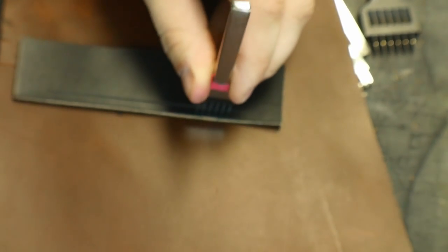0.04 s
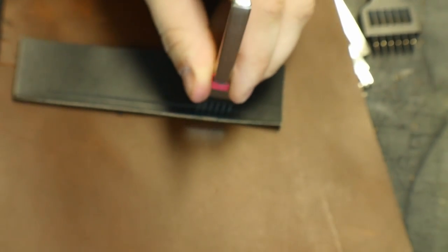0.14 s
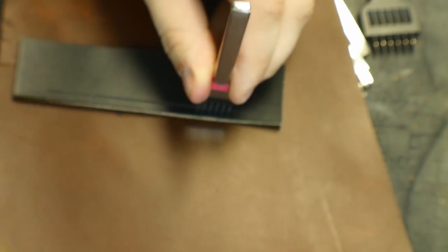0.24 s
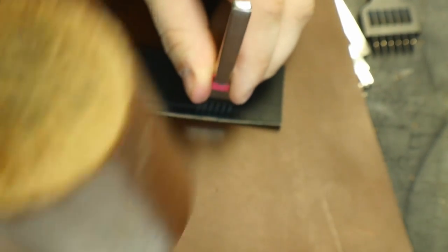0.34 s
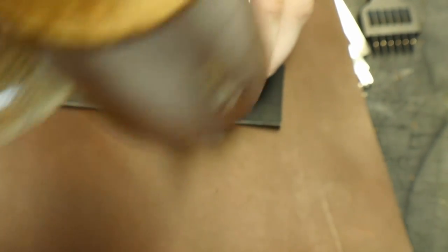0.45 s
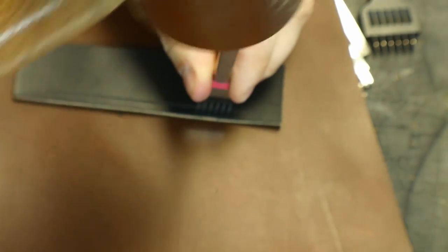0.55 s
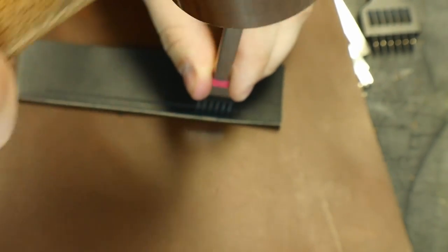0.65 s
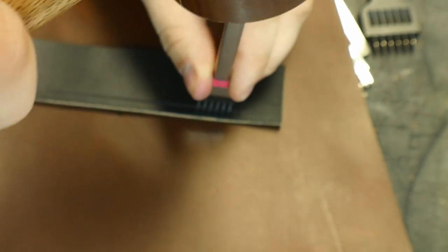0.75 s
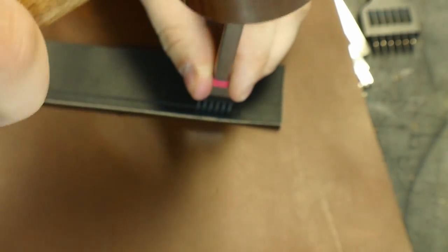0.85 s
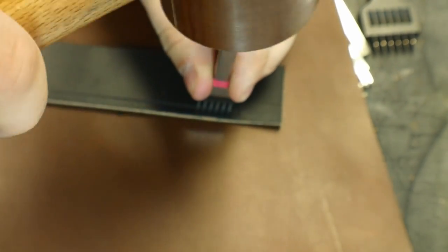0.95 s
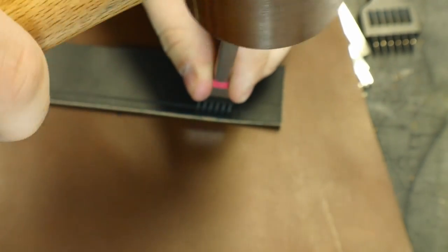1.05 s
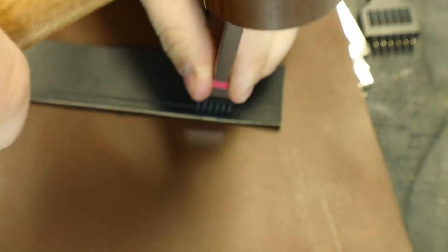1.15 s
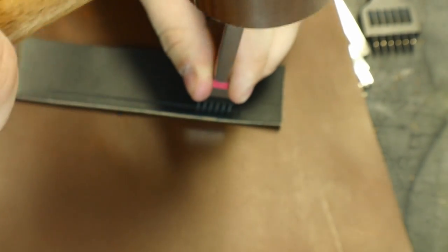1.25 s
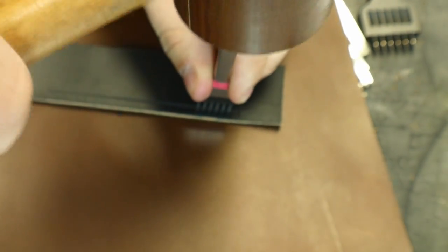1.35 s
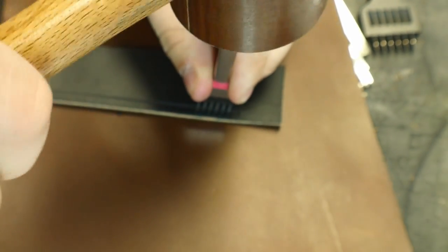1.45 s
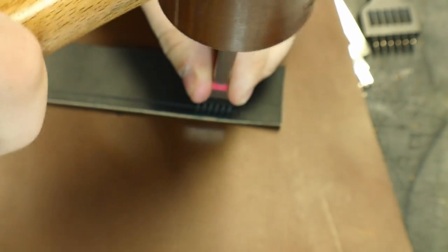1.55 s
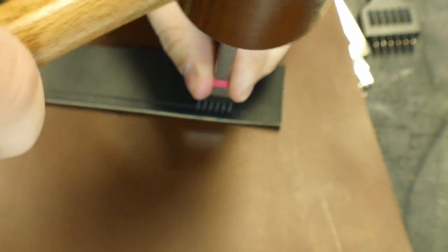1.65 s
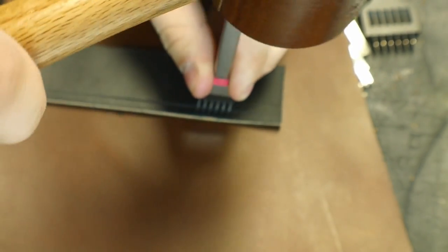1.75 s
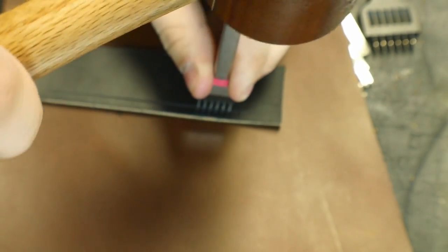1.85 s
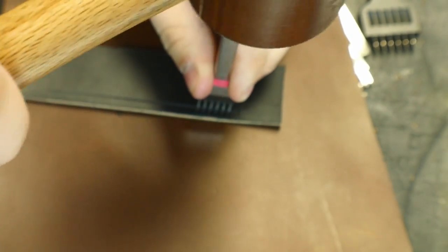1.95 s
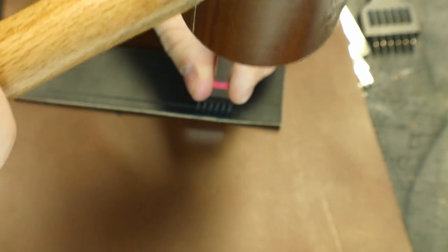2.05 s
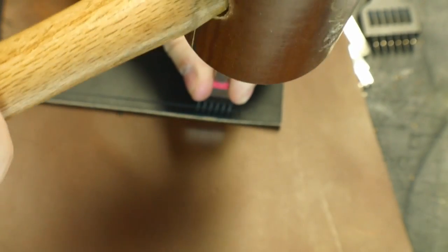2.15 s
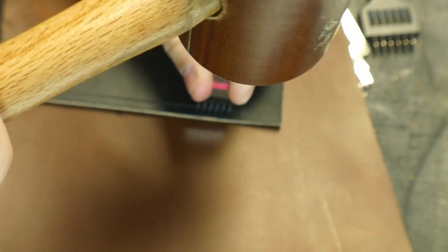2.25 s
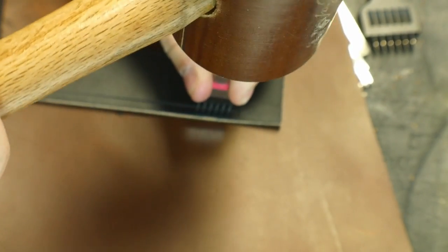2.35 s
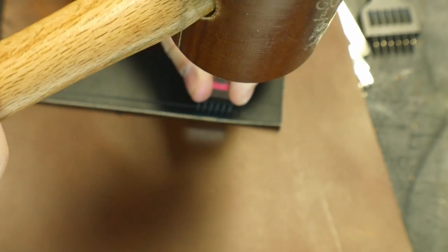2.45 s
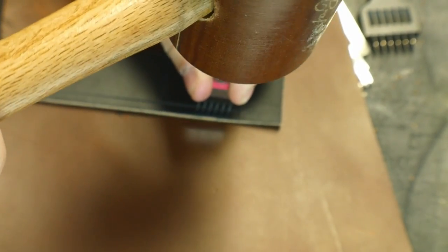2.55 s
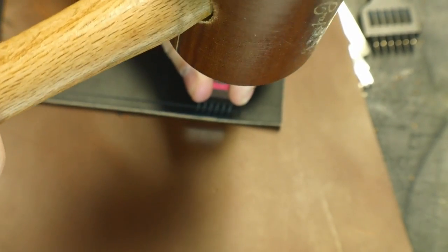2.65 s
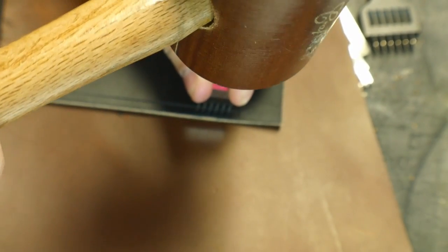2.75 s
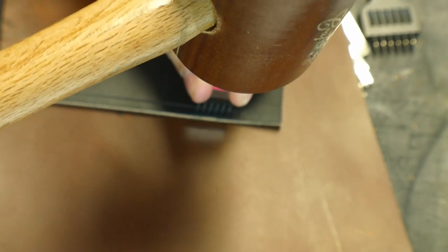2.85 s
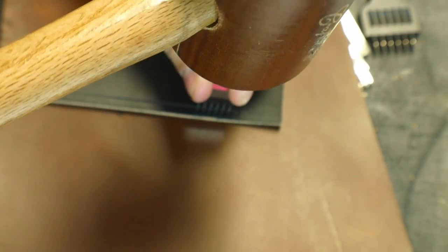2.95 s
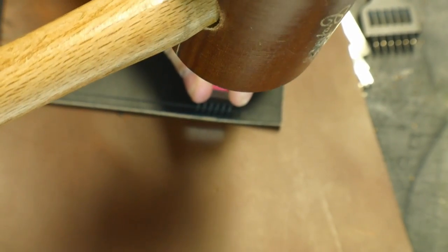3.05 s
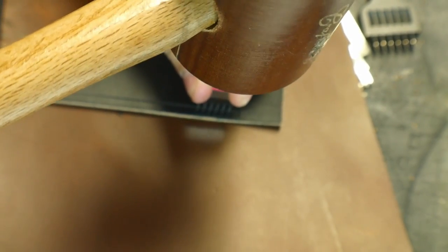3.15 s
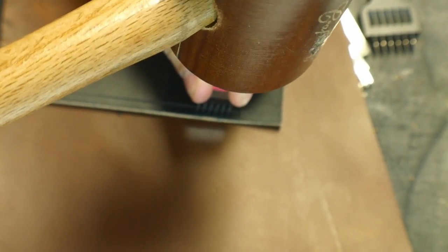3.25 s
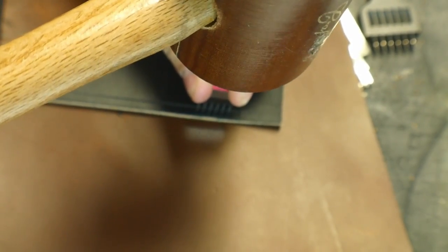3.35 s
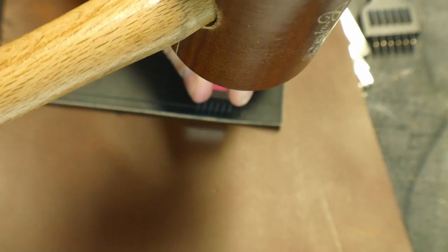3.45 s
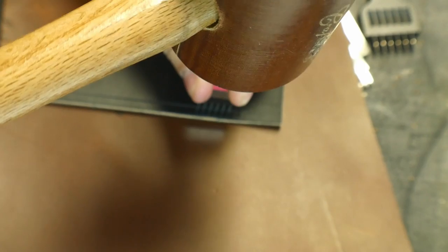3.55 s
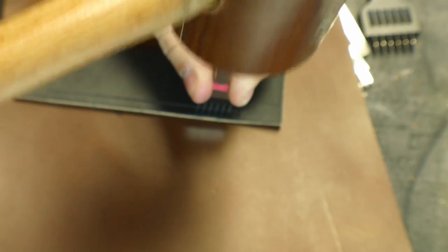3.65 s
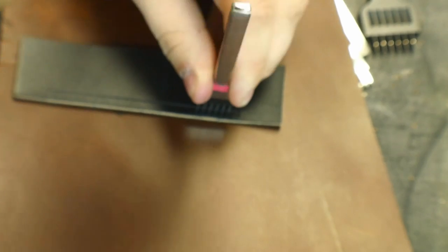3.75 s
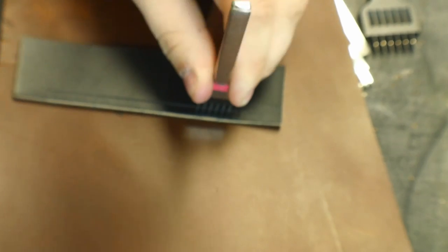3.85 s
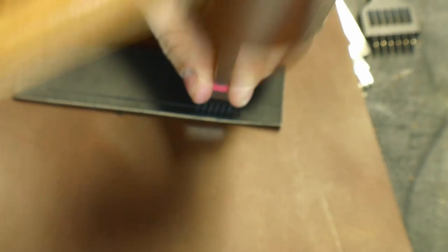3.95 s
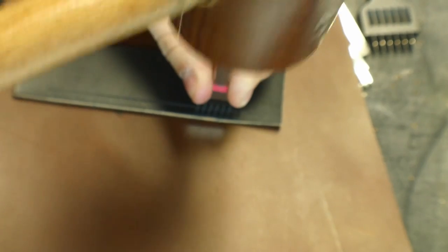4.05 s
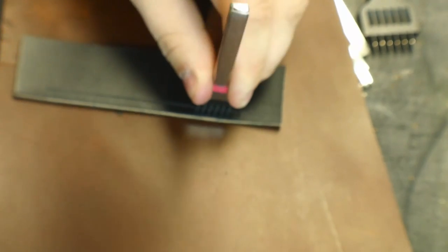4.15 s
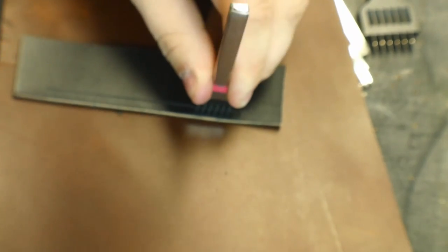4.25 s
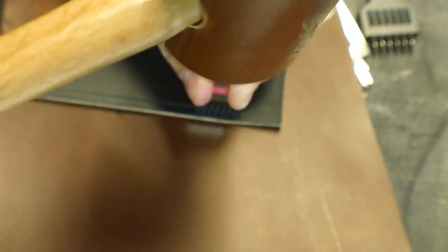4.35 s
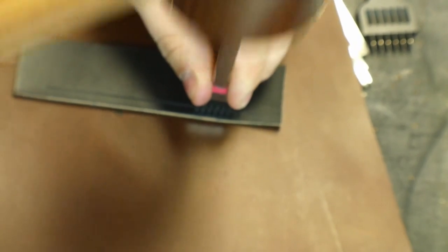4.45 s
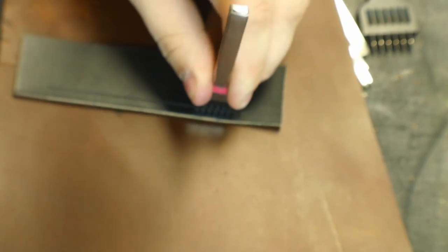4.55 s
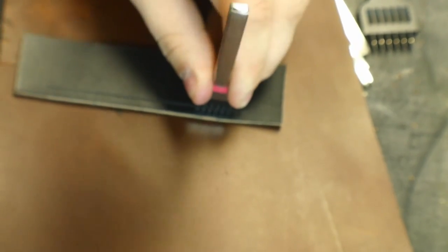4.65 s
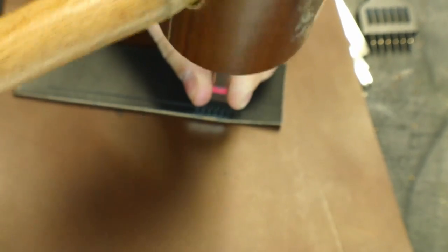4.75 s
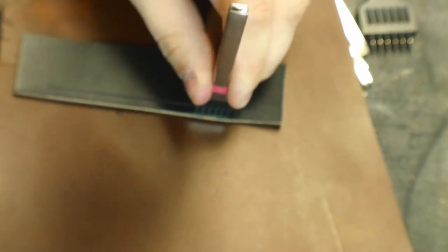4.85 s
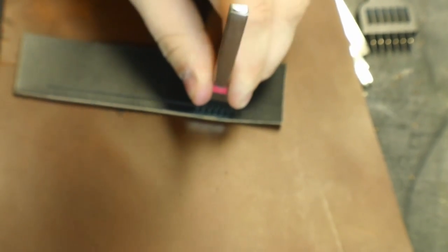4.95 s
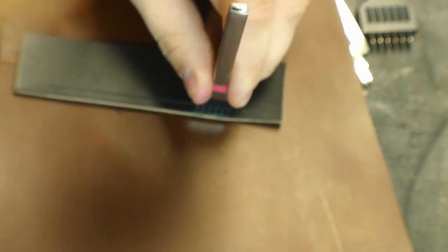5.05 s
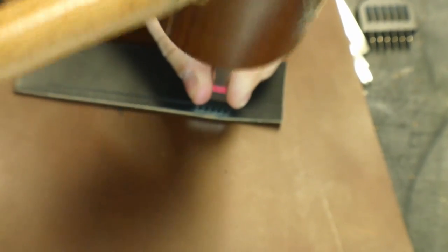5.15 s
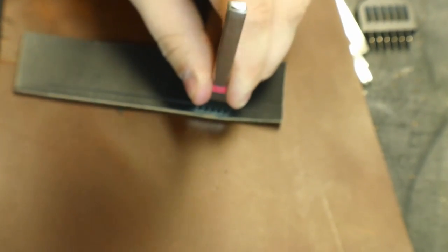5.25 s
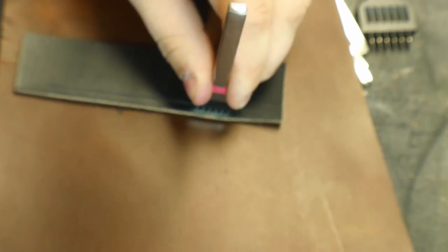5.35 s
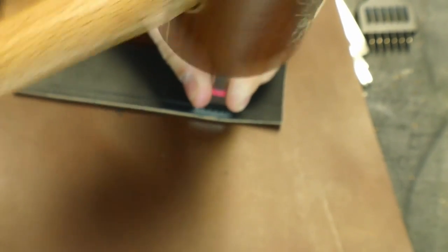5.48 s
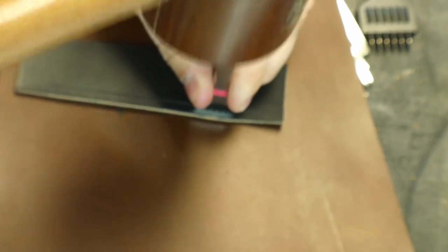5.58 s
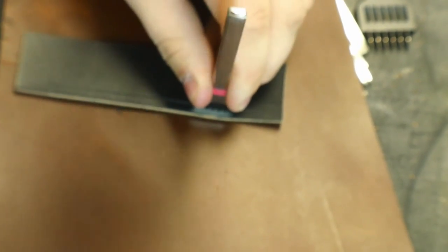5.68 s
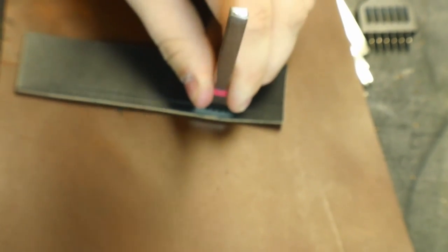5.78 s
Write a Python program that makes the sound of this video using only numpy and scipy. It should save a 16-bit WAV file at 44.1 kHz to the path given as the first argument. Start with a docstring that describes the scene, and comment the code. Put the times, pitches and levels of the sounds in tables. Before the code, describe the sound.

Close, nearly mono workshop sound over low, airy room noise with very faint wavering machine tones. At the start a metallic clink and wash of noise die away within about 0.3 s, amid soft hand rustle. A light mallet tap comes at 1.0 s, another at 1.4 with a soft rebound, a barely audible touch at 1.6, and a duller tap at 2.35. Between them, tiny gritty ticks creak in the leather, notably around 1.75 and 2.07. From 2.4 to 4.0 it is mostly quiet, with small ticks and handling rumble. Then five hard blows land at 4.03, 4.41, 4.77, 5.14 and 5.55 s: abrupt, clipped cracks mixing dry wood knock, short bright steel clack, leather crunch and sinking bench thump. Each overloads the microphone, briefly ducking the level, and leaves diffuse reverberation and low table boom. Low bumps and ticks precede the third and fifth blows; the last tail fades.

```python
"""In a workshop, a wooden mallet drives a steel pricking iron through leather on a stone block.
Light taps, one barely audible, seat the iron; five hard blows then overload the microphone and ring the room.
Blows are sums of damped modes, a pressure spike and gritty noise, convolved with diffuse reverberation.
Stick-slip noise bursts tick in the leather, and slow pressure swings bump the microphone.
Swelling noise follows the hands, a clink fades at the start, and faint tones waver in the room noise."""
import sys
import numpy as np
from scipy import signal
from scipy.fft import rfft, irfft
from scipy.io import wavfile
from scipy.ndimage import uniform_filter1d

SR = 44100
rng = np.random.default_rng(int(sys.argv[2]) if len(sys.argv) > 2 else 0)


def dump_mix(stems):
    """Bounce the given channels to the path in sys.argv[1] as a 16-bit WAV at rate SR."""
    frames = np.atleast_2d(stems).T  # one column per channel
    limited = np.clip(frames, -1, 1)  # hard clip at full scale
    pcm = np.round(limited * 32767).astype(np.int16)
    wavfile.write(sys.argv[1], SR, pcm)


N = 256560
TIME = np.arange(N) / SR  # s

# All levels are relative: the functions weight, filter and mix them.
# Blows: t/s, force on iron level/dB, wood knock level/dB, face ring level/dB, face ring f/Hz,
# push on bench level/dB, delay of first rebound t/s, rebound level/dB
BLOWS = [(1.0141, -26, -7, -12.5, 3480, -32, 0.045, -34),
         (1.4298, -21.5, -4, -7.5, 3640, -26.5, 0.043, -10.5), (1.6402, -66, -31, -50, 3600, -42, .02, -50),
         (2.349, -19.5, -12.5, -4.5, 2760, -37, 0.034, -21.5),
         (4.027, 8.5, -3.5, 15.5, 3403, -30, 0.044, -38), (4.409, 11, -8, 13, 4700, -29.5, 0.029, -13),
         (4.7668, 13, -2, 1, 3870, -32, 0.024, -9), (5.1423, 12, -12, 8.5, 4245, -31.5, .015, -7.5),
         (5.5526, 12, -10.5, 15, 4270, -28, 0.022, -13)]
# Modes of the mallet head: f/Hz, level/dB, t60/s
WOOD_MODES = [(872, 4.5, 0.013), (988, 1.5, 0.014), (1460, 9, 0.0093), (1680, 5, 0.0073),
              (2040, -0.5, 0.016), (2350, -51, .008)]
# Modes of the hand-held iron: f/Hz, level/dB, t60/s
IRON_MODES = [(1473, 2.5, 0.0099), (2917, -11, 0.015), (3236, 2.5, 0.0065), (4043, 11.5, 0.0037),
              (4525, -5, 0.011), (4740, 2.5, 0.0047), (5150, -45, 0.014), (6422, 0.5, 0.0054),
              (8930, -3.5, 0.0067), (11315, 7, 0.0046)]
# Long thin tones of the iron's shank: f/Hz, level/dB, t60/s
SHANK_MODES = [(4240, -38, 0.28), (5620, -33, 0.22), (8540, -40, 0.17), (11218, -44, .22)]
# Modes of the stone block under the pad: f/Hz, level/dB, t60/s
BLOCK_MODES = [(128, -42, 0.12), (262.2, -29, 0.18), (369, -26.5, 0.053)]
# Modes of the bench top, before the sag slows them: f/Hz, level/dB, t60/s
BENCH_MODES = [(140.3, 0, 0.15), (260, 2, 0.035), (448, -4, 0.017)]
# Slow modes of the whole table: f/Hz, level/dB, t60/s
TABLE_MODES = [(41, 2, 1.7), (96.4, 5, 1.06), (77.3, -2, 0.68), (1330, -34, 3.5)]
# Spectrum of leather grit: f/Hz, level/dB per Hz
LEATHER_SPECTRUM = [(100, 11), (500, -7.5), (1200, 1), (2200, -9.5), (3000, 1), (6300, -3), (7500, -11.5),
                    (11000, -6.5), (16000, -13)]
# Shifts of the prongs in the leather: t/s, number of slips, level/dB
SHIFTS = [(0.767, 1, -34.5), (1.411, 1, -31), (1.736, 3, -27), (1.92, 2, -33.5), (2.068, 1, -20.5),
          (2.164, 1, -35.5), (2.286, 1, -33), (3.047, 1, -33), (3.868, 2, -35), (3.916, 4, -32),
          (4.667, 1, -19.5), (5.412, 1, -24), (5.44, 2, -16.5)]
# Low bumps on the microphone: t/s, level/dB, f/Hz
BUMPS = [(4.651, -9, 43.3), (4.704, -12.5, 20.2), (5.407, -7.5, 47), (5.454, -8.5, 21.6)]
# Movements of hands and forearm: middle t/s, half length t/s,
# rumble level/dB, sleeve level/dB, rustle level/dB
MOVES = [(0, 0.19, -44.5, -61, -51), (0.418, 0.14, -49, -50.5, -58.5), (0.704, 0.13, -53, -66, -58),
         (1.786, 0.38, -49, -79, -53), (3.612, .2, -47, -72, -70), (3.933, 0.028, -34.5, -58, -58),
         (5.2, 1, -33, -60, -80)]
# Spectrum of handling rumble: f/Hz, level/dB per Hz
RUMBLE_SPECTRUM = [(20, 4), (50, 6), (105, -1), (160, -10), (250, -9.5), (400, -22), (1500, -52),
                   (16000, -87)]
# Spectrum of the sliding forearm: f/Hz, level/dB per Hz
SLEEVE_SPECTRUM = [(20, -40), (150, 4), (230, 11), (400, -3), (600, -3), (1500, -42), (16000, -48)]
# Spectrum of skin on leather: f/Hz, level/dB per Hz
RUSTLE_SPECTRUM = [(20, -1), (400, 7), (1300, 7.5), (2400, 4), (4000, 0), (6500, -3), (8000, -9.5),
                   (16000, -14.5)]
# Colour of the reverberation: f/Hz, level/dB
ROOM_COLOUR = [(40, 16.5), (130, 2.5), (195, 5.5), (260, 8.5), (450, -2.5), (850, -16), (1200, -16.5),
               (1480, -14.5), (1800, -17), (2300, -21.5), (3300, -16.5), (4200, -17), (5200, -19),
               (6600, -18), (7300, -23), (8500, -20), (11400, -24), (16000, -27)]
# Decay of the reverberation: f/Hz, t60/s
ROOM_T60 = [(100, 0.95), (300, 0.48), (1000, 0.87), (2000, 0.82), (4000, 0.85), (6500, 0.66), (9000, 0.47),
            (14000, 0.3)]
# Spectrum of room noise: f/Hz, level/dB per Hz
AIR_SPECTRUM = [(12, -35), (20, 8), (80, -4), (119, 1), (185, -11.5), (238, -5), (266, -13.5), (465, -11.5),
                (505, -14), (1450, -18.5), (1630, -20), (3350, -25), (15500, -37.5)]
# Wavering machine tones: centre f/Hz, level/dB
HUM_TONES = [(236.9, -61.5), (1507, -69.5), (3235, -72), (3725, -73), (3801, -71), (4296, -74)]

# A harder blow makes a sharper contact and more thump for the same push (values at a force of 0 dB)
CONTACT_HZ, FORCE_DB_PER_OCTAVE = 6840, 47
THUMP_DB, THUMP_DB_PER_DB = 18.5, 0.3451
# The thump's pitch sinks as the slower, longer waves of the bench top arrive
THUMP_SAG_SHARE, THUMP_SAG_S = 0.37, 0.11
# The head bounces softly on the iron, each time sooner and weaker
BOUNCE_CONTACT_HZ, BOUNCE_GAP_SHARE, BOUNCE_LOSS_DB, BOUNCE_THUMP_DB = 1770, 0.44, 9, -22
SLIP_GAP_S, SLIP_SHARP_HZ = 0.0145, 6100
STRAY_TICKS_PER_S, STRAY_TICK_DB, SEATED_S = 14, -41, 2.3
AIR_DB = -50
EDGE_HZ = 16000  # upper band limit of the output


def mallet(push_db=4, push_s=0.0001, echo_s=0.01, echo_db=-30, knock_wet_db=1, steel_wet_db=-4,
           thump_wet_db=-9, face_wet_db=-3, crack_db=22, crack_s=0.00003, crack_wet_db=1.5,
           crunch_db=-9, crunch_s=0.0031):
    """Impact excitation: a pressure spike and damped modes, low-passed by contact stiffness, drive the room."""
    out = np.zeros(N)
    t = TIME[:SR * 3 // 4]
    brief = t[:SR // 25]
    spike = -amp(push_db) * (1 - t / push_s) * np.exp(-t / push_s)
    head = spike + ring(WOOD_MODES, t, rise=0.002)
    soft_head = soften(head, BOUNCE_CONTACT_HZ)
    crack = amp(crack_db) * thin(np.exp(-t[:SR // 100] / crack_s), hz=2210, order=1)
    # the small iron radiates little bass
    iron = thin(ring(IRON_MODES, brief, rise=0.00042), hz=930)
    shank = ring(SHANK_MODES, t, rise=0.0003)  # the fingers damp these thin tones only weakly
    block = ring(BLOCK_MODES, t, rise=0.00058)
    # a slowing clock lowers the pitch and lengthens the decay
    sagging_t = np.cumsum(1 - THUMP_SAG_SHARE * (1 - np.exp(-t / THUMP_SAG_S))) / SR
    bench = thin(ring(BENCH_MODES, sagging_t, rise=0.00027), hz=71.5)
    # the heavy table is slow to get going, and something loose on it sings faintly
    boom = ring(TABLE_MODES, t, rise=0.041)
    grit = noise(LEATHER_SPECTRUM)
    for s, force_db, wood_db, face_db, face_hz, bench_db, rebound_s, rebound_db in BLOWS:
        contact_hz = CONTACT_HZ * 2 ** (force_db / FORCE_DB_PER_OCTAVE)

        steel = amp(force_db) * (shank + block)
        add(steel, 0, amp(force_db) * iron)
        # the prongs crunch through the leather
        crunch = grit[round(s * SR):][:len(brief)] * np.exp(-brief / crunch_s)
        add(steel, 0, amp(force_db + crunch_db) * crunch)
        steel = -soften(steel, contact_hz)

        # the mallet's face rings at a pitch that depends on where it lands
        face_ring = thin(ring([(face_hz, 0, 0.007)], t, rise=0.00071), hz=1280)
        face = -amp(face_db) * soften(face_ring, contact_hz)

        knock = amp(wood_db) * soften(head, contact_hz)
        knock = knock + amp(rebound_db) * rebounds(soft_head, rebound_s)

        thump = amp(bench_db + THUMP_DB + THUMP_DB_PER_DB * force_db) * bench
        thump = thump + amp(rebound_db + BOUNCE_THUMP_DB) * rebounds(bench, rebound_s)

        blow = knock + face + steel + thump
        add(out, s, blow + amp(bench_db) * boom)
        add(out, s + echo_s, amp(echo_db) * blow)  # the nearest surface answers first
        # the big wooden head fills the room more readily than the thin iron
        metal = thin(amp(steel_wet_db) * steel + amp(face_wet_db) * face, hz=347)
        add(out, s, room(amp(knock_wet_db) * knock + metal + amp(thump_wet_db) * thump))
        # the crack of the contact spreads sideways and returns only by way of the walls
        add(out, s, amp(force_db + crack_wet_db) * room(soften(crack, contact_hz)))
    return out


def rebounds(bounce, first_gap_s, count=3):
    """Inelastic rebound: gaps and levels shrink at each successive bounce."""
    out = np.zeros(len(bounce))
    s = 0
    for k in range(count):
        s += first_gap_s * BOUNCE_GAP_SHARE ** k
        add(out, s, amp(-BOUNCE_LOSS_DB * k) * bounce)
    return out


def leather(slip_s=0.0022, rise_s=0.00088, room_db=-8, uneven=0.14, scatter_db=2.5):
    """Stick-slip friction: prongs slip in brief gritty ticks, with random strays until the iron is seated."""
    out = np.zeros(N)
    t = TIME[:SR // 40]
    grit = soften(noise(LEATHER_SPECTRUM), SLIP_SHARP_HZ)
    envelope = np.exp(-t / slip_s) * (1 - np.exp(-t / rise_s))
    slips = []
    for s, count, db in SHIFTS:
        for k in range(round(count)):
            jitter = uneven * min(k, 1) * rng.uniform(-1.35, 1)  # none on the first slip
            slips.append((s + SLIP_GAP_S * (k + jitter), db))
    strays = TIME[(rng.random(N) < STRAY_TICKS_PER_S / SR) & (TIME < SEATED_S)]
    slips += [(s, STRAY_TICK_DB + scatter_db * rng.standard_normal()) for s in strays]
    for s, db in slips:
        add(out, s, amp(db) * envelope * grit[round(s * SR):][:len(t)])
    return out + amp(room_db) * room(out)[:N]


def bumps(cycles=0.48):
    """Heavily damped oscillation: slow pressure swings whose envelope peaks after about half a cycle."""
    out = np.zeros(N)
    t = TIME[:SR // 2]
    for s, db, hz in BUMPS:
        age = t * hz / cycles
        add(out, s, amp(db) * age * np.exp(1 - age) * np.sin(2 * np.pi * hz * t))
    return out


def hands():
    """Sliding friction: each move swells and fades as handling rumble, sleeve noise and skin on leather."""
    out = np.zeros(N)
    spectra = [RUMBLE_SPECTRUM, SLEEVE_SPECTRUM, RUSTLE_SPECTRUM]
    sounds = np.array([noise(spectrum) for spectrum in spectra])
    for s, half_s, *levels_db in MOVES:
        swell = np.exp(-((TIME - s) / half_s) ** 2)
        out += swell * (amp(levels_db) @ sounds)
    return out


def fading_clink(hz=1264, tone_db=-41, tone_t60=0.27, wash_db=-46, wash_t60=0.37):
    """Exponential decay: a metallic note and a wash of noise die away from the start."""
    note = ring([(hz, tone_db, tone_t60)], TIME, rise=0.0028)
    wash = amp(wash_db - 60 * TIME / wash_t60) * noise(RUSTLE_SPECTRUM)
    return note + wash


def room(x, build=0.00048):
    """Diffuse reverberation: noise decays at a rate set by frequency, with a new pattern at every call."""
    hz, t, z = signal.stft(rng.standard_normal(SR), SR, nperseg=512)
    t60 = read(ROOM_T60, hz)[:, None]
    decay = amp(read(ROOM_COLOUR, hz)[:, None] - 60 * t / t60)
    even_energy = np.sqrt(2 * np.log(1000) / (t60 * SR))  # offsets the extra energy of a longer decay
    tail = signal.istft(z * decay * even_energy, SR, nperseg=512)[1][:SR]
    return signal.fftconvolve(x, tail * (1 - np.exp(-(TIME[:SR] / build) ** 2)))


def workshop(waver_hz=9, waver_db=3, hum_db=-2):
    """Stationary background: coloured noise plus machine tones with random frequency and level modulation."""
    out = amp(AIR_DB) * thin(noise(AIR_SPECTRUM), hz=38.6, order=3)
    for hz, db in HUM_TONES:
        turns = np.cumsum(hz + waver_hz * wander(size=1500)) / SR
        level = amp(db + hum_db + waver_db * wander(size=6000))
        out += level * np.sqrt(2) * np.sin(2 * np.pi * turns)
    return out


def ring(modes, t, rise):
    """Modal superposition: decaying sinusoids share a build-up time of rise seconds."""
    total = sum(amp(db - 60 * t / t60) * np.sin(2 * np.pi * hz * t) for hz, db, t60 in modes)
    return total * (1 - np.exp(-t / rise))


def noise(spectrum):
    """Spectral shaping: white noise is filtered to a given colour at rms 1."""
    gain = amp(read(spectrum, np.fft.rfftfreq(N, 1 / SR)))
    return evened(irfft(rfft(rng.standard_normal(N)) * gain, N))


def soften(x, hz):
    """Contact low-pass: a softer contact excites little above hz."""
    sos = signal.butter(2, min(hz, SR / 2 - 1000), fs=SR, output="sos")
    return signal.sosfilt(sos, x)


def thin(x, hz, order=2):
    """High-pass filtering: attenuates what lies below hz."""
    return signal.sosfilt(signal.butter(order, hz, "high", fs=SR, output="sos"), x)


def wander(size):
    """Random modulation: noise smoothed over size samples, at rms 1."""
    return evened(uniform_filter1d(rng.standard_normal(N), size))


def evened(x):
    """Power normalization: scales to rms 1."""
    return x / np.sqrt(np.mean(x ** 2) + 1e-20)


def amp(db):
    """Logarithmic level: converts decibels to amplitude gain."""
    return 10 ** (np.asarray(db) / 20)


def read(points, hz):
    """Logarithmic pitch scale: interpolates a table over log frequency."""
    f, value = np.transpose(points)
    return np.interp(np.log(hz + 1), np.log(f + 1), value)


def add(mix, s, sound):
    """Linear superposition: adds a sound into mix from s seconds."""
    part = mix[max(round(s * SR), 0):][:len(sound)]
    part += sound[:len(part)]


def scene():
    """Superposition of all sources, alike in both channels."""
    mono = mallet() + leather() + bumps() + hands() + fading_clink() + workshop()
    return np.array([mono, mono])


def record(dry, threshold_db=3, depth=0.82, recover_db_per_s=65, attack_s=0.0019, side_db=-30):
    """Dynamic compression: gain ducks on overload and recovers; peaks it misses clip, then the band is limited."""
    over_db = np.maximum(20 * np.log10(abs(dry[0]) + 1e-9) - threshold_db, 0)
    # hold each overload, letting it fall at a constant rate
    fall = TIME * recover_db_per_s
    held_db = np.maximum.accumulate(over_db + fall) - fall
    keep = np.exp(-1 / (attack_s * SR))
    smooth_db = signal.lfilter([1 - keep], [1, -keep], held_db)
    ducked = dry * amp(-depth * smooth_db)
    # the two capsules differ slightly in phase, least in the bass
    skew = signal.hilbert(thin(ducked[0], hz=193, order=1)).imag
    stereo = ducked + amp(side_db) * np.array([[1], [-1]]) * skew
    clipped = np.clip(stereo, -1, 1)
    lowpass = signal.firwin(255, EDGE_HZ, window=("kaiser", 7), fs=SR)
    return signal.oaconvolve(clipped, lowpass[None], "same", axes=1)


dry = scene()
out = record(dry)
dump_mix(out)
```